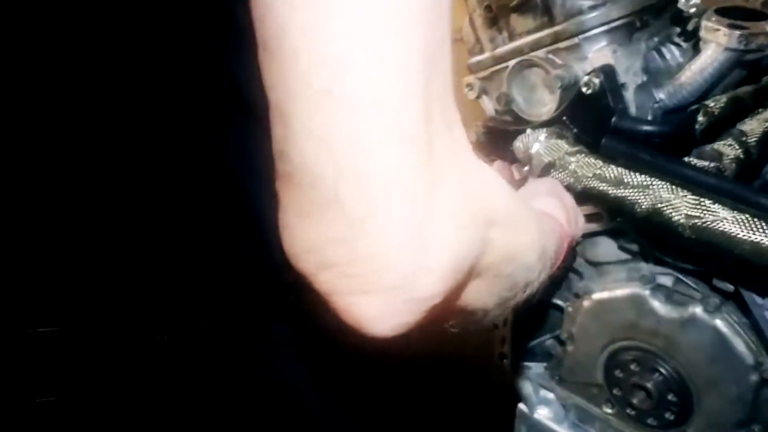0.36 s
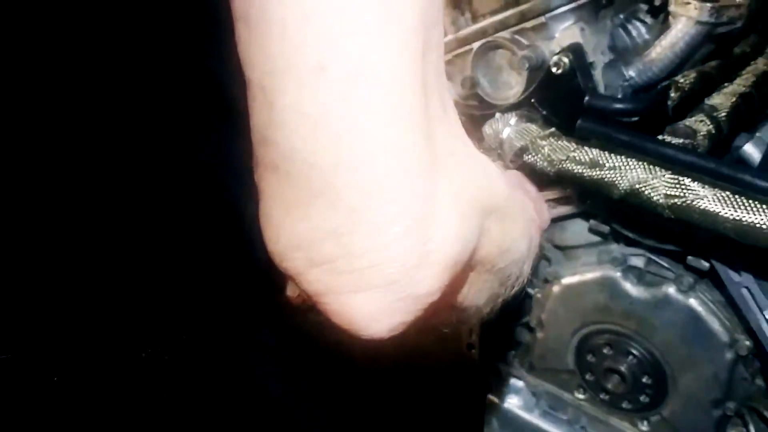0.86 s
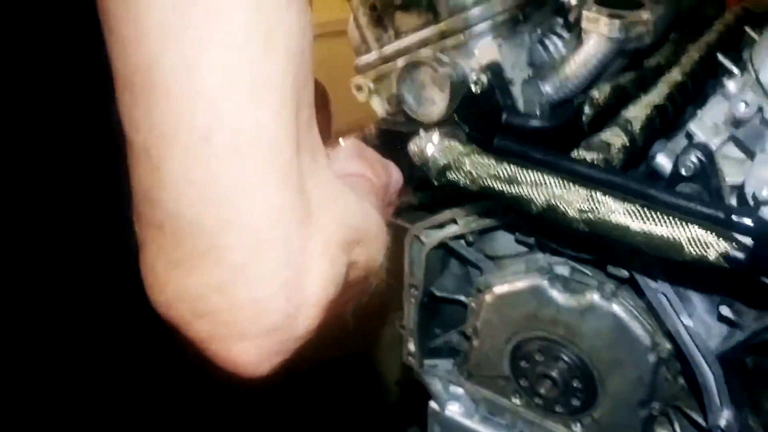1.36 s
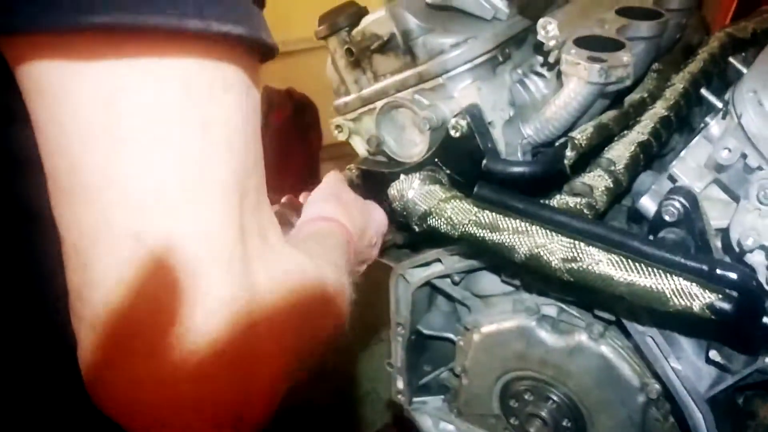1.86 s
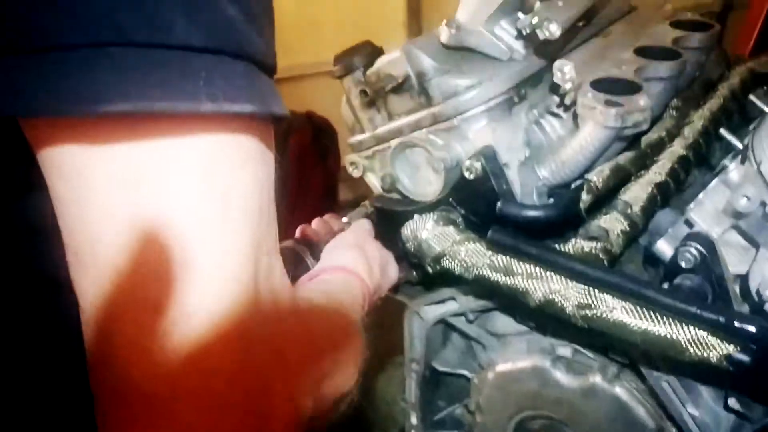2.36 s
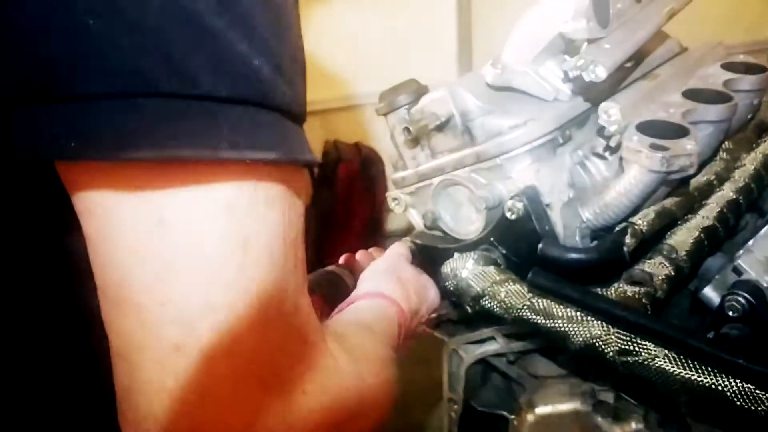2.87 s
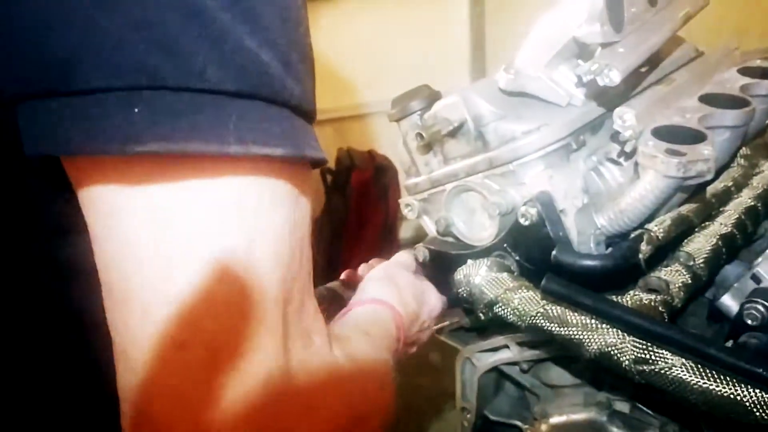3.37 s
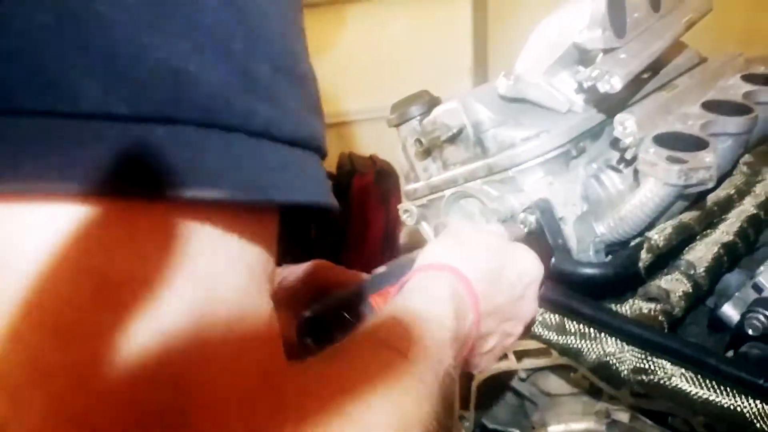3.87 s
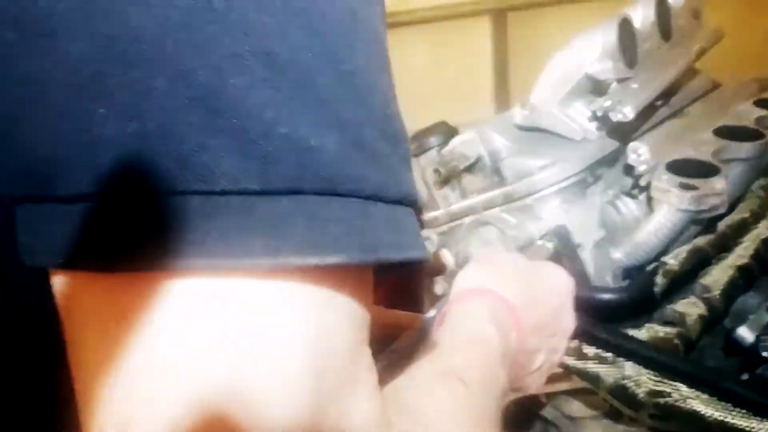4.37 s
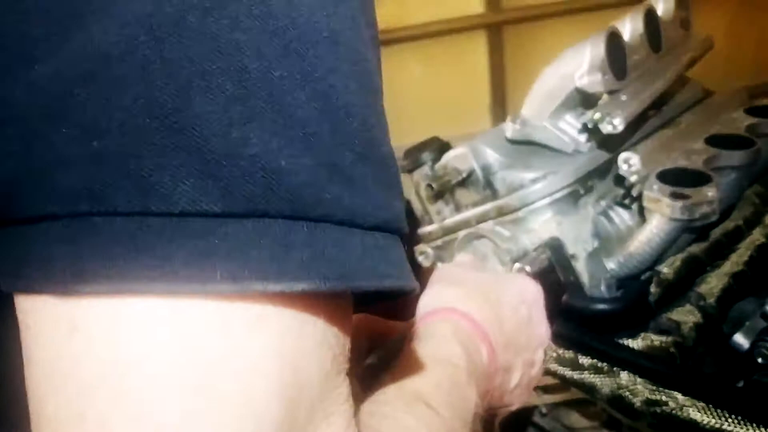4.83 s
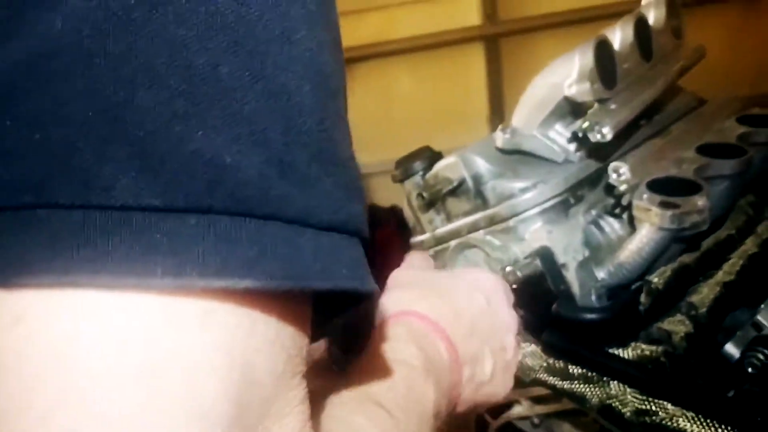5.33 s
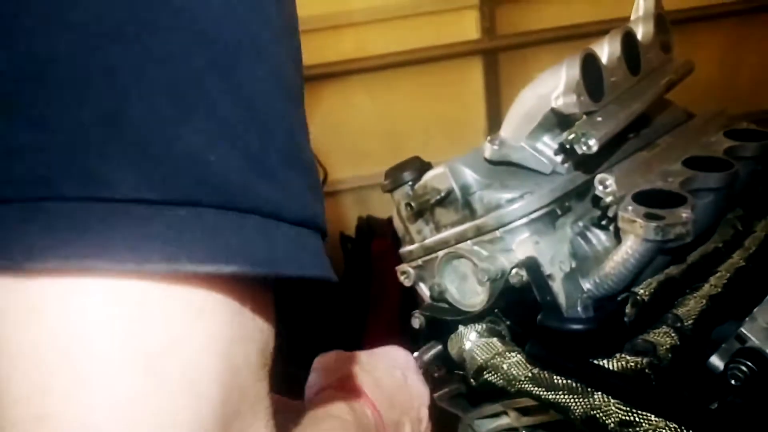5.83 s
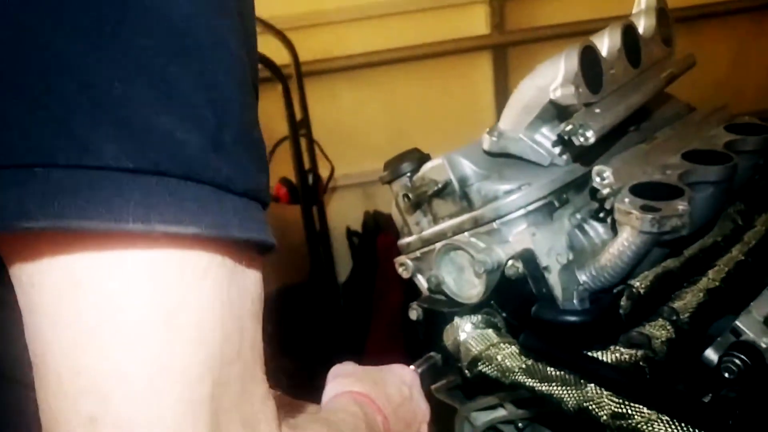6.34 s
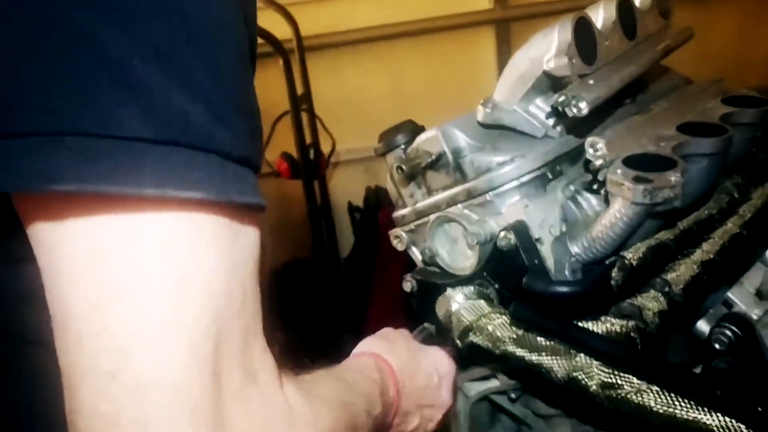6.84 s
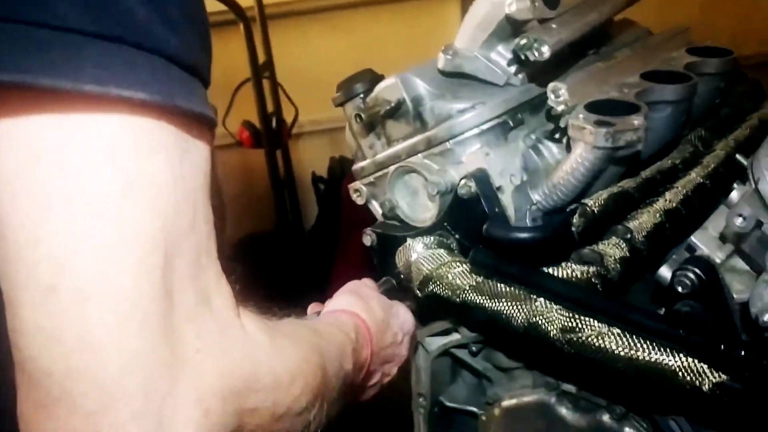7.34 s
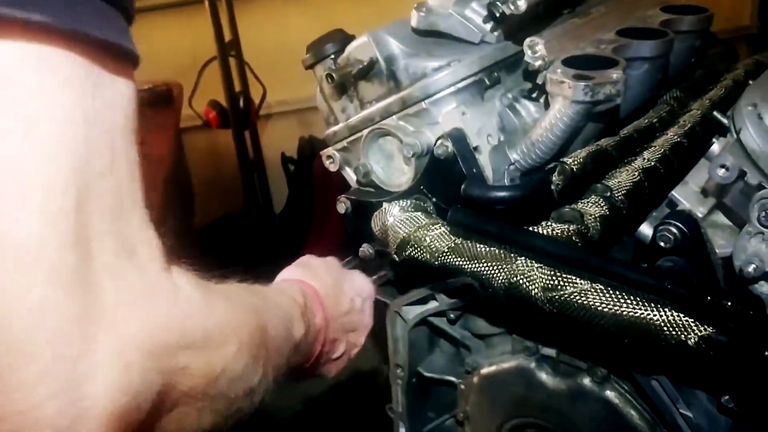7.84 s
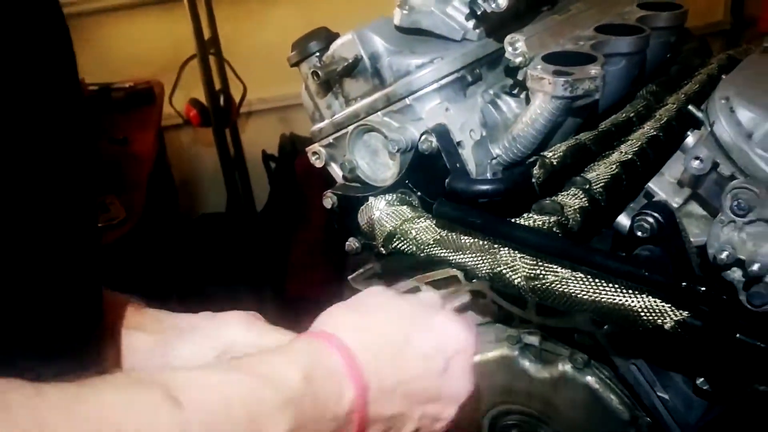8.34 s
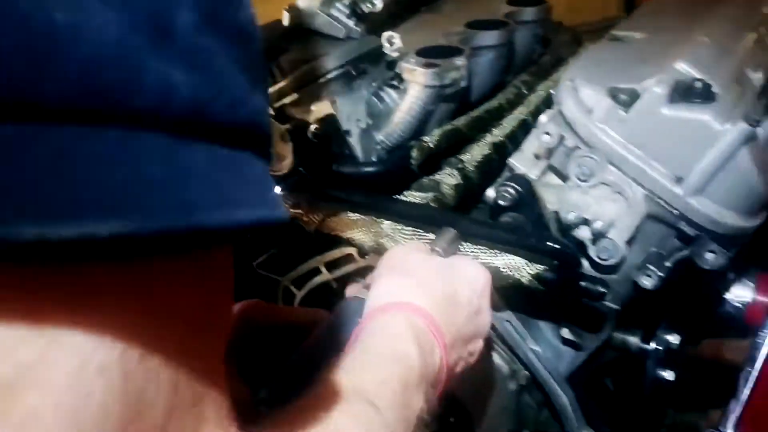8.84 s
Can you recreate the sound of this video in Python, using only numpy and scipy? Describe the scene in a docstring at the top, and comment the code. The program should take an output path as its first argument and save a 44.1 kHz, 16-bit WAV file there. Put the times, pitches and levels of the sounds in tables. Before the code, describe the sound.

A handheld recorder sits close to a small electric wrench tightening bolts on an engine. Early heavy finger rubbing on the left accompanies the first whirring, hammering burst; scrapes and grip knocks follow. Three more bursts come later, each a quick whine falling into rapid metal blows. Sharp trigger and socket ticks lie between them, over quiet low shop hum and a short room echo. The tool is clearer and brighter on the right.

```python
"""Workshop: a small cordless power wrench runs bolts down on an engine; motor and gears whir, whine, then hammer.
Whir and drone are filtered random tooth contacts, whine is sines following the motor, blows ring decaying modes.
A hand holds the stereo recorder, muffles its left port and rubs and bumps the case: filtered grit, short swings.
Sleeve and skin rustle near the right port; coloured noise makes the air and low hum of the shop."""
import sys
import numpy as np
from scipy import signal
from scipy.fft import rfft, irfft
from scipy.io import wavfile

SR = 44100
rng = np.random.default_rng(int(sys.argv[2]) if len(sys.argv) > 2 else 0)


def master_out(mix):
    """Clip the mix to full scale and print it as 16-bit PCM to the path in sys.argv[1]."""
    frames = np.transpose(np.atleast_2d(mix))
    ceiling = np.clip(frames, -1, 1)
    pcm = np.round(ceiling * 32767).astype(np.int16)
    wavfile.write(sys.argv[1], SR, pcm)


def voltage_ratio(decibels):
    """Convert decibels (scalar or array-like) to amplitude ratios, 20 dB per decade."""
    exponent = np.asarray(decibels, float) / 20
    return 10 ** exponent


N = 405719

# long trigger pulls, one list each: t/s, gear mesh f/Hz, relative whir level/dB, mesh tone re whir/dB
TRIGGER_PULLS = [
    [(.215, 800, -44.5, -19.5), (.275, 1400, -33.5, -4.5), (.345, 2950, -28.5, -7),
     (.39, 3070, -26.5, -4.5), (.45, 2300, -32.5, -14.5), (.52, 1100, -40, -16), (.61, 1882, -30.5, -6.5),
     (.7, 3100, -23.5, -11.5), (.735, 3380, -23, 1.5), (.765, 3000, -21.5, -1), (.8, 2500, -16, -21.5),
     (.885, 2300, -18.5, -22)],
    [(2.69, 800, -44, -14.5), (2.74, 1200, -31.5, -14), (2.78, 1600, -30.5, 3), (2.83, 2300, -25.5, -4),
     (2.875, 2520, -21.5, -3), (2.91, 3280, -22.5, 0.0), (2.975, 3290, -21.5, 2), (3.045, 2400, -26, 1.5),
     (3.085, 1740, -27.5, 2.5), (3.14, 2100, -25.5, 0.0), (3.19, 1600, -27, 3), (3.26, 1050, -27, -9.5),
     (3.35, 900, -24, -19.5)],
    [(5.125, 900, -41.5, -11.5), (5.17, 1300, -34, -8), (5.235, 2030, -27, 0), (5.26, 2100, -25.5, -11),
     (5.29, 1791, -23, -15), (5.35, 2290, -20.5, -6), (5.46, 2340, -20, -6.5), (5.495, 1600, -20, 0),
     (5.54, 1300, -16.5, -20.5)],
    [(7.435, 900, -38, -24.5), (7.505, 1740, -33.5, -1.5), (7.57, 2450, -27, -6), (7.6, 2200, -25, -11),
     (7.65, 2300, -23.5, -7.5), (7.7, 2330, -21.5, -5), (7.75, 2000, -19, -19), (7.86, 1900, -18, -19.5)],
]
# treble colour of gear whir and impact cracks: f/Hz, density/dB
WHIR_COLOUR = [(900, -24.5), (1500, -10.5), (2400, -8.5), (2900, -11), (3800, -5.5), (5300, -8.5),
               (6200, -2.5), (8100, 1), (8500, -15), (9200, -17), (15600, -21)]
# modes of socket, bolt and casting: f/Hz, relative level/dB, t60/s
CASTING_MODES = [(595, -12.5, 0.054), (782, -17.5, 0.34), (1197, 2, 0.017), (1287, -10.5, .04),
                 (1600, -5, 0.016), (1807, -8.5, 0.095), (1860, -7, 0.11), (1959, -9, 0.045),
                 (2054, -8.5, 0.082), (2155, 2.5, 0.026), (2280, -12.5, 0.057), (3276, -1, 0.014),
                 (5540, -8, 0.0082), (6300, 3, .01), (7260, -19, .01)]


def at_hz(points, hz):
    """Table value on a log-frequency axis."""
    table_hz, value = np.array(points).T
    return np.interp(np.log(hz + 1e-9), np.log(table_hz), value)


def rms_one(x):
    """Scale to unit rms."""
    return x / np.sqrt(np.mean(x ** 2) + 1e-20)


def played(tables):
    """Gate with 6 ms edges and the columns in time, for tables that each cover one span."""
    t = np.arange(N) / SR
    s, *columns = np.transpose(np.concatenate(tables))
    gate = np.zeros(N)
    for rows in tables:
        inside_s = np.minimum(t - rows[0][0], rows[-1][0] - t)
        gate += np.clip(inside_s / .006 + 1, 0, 1)
    return [np.minimum(gate, 1)] + [np.interp(t, s, column) for column in columns]


def colour(x, spectrum):
    """Causal minimum-phase filter with the given dB response."""
    gain = voltage_ratio(at_hz(spectrum, np.linspace(0, SR / 2, 2049)))
    cepstrum = irfft(np.log(gain))
    cepstrum[1:2048] *= 2      # fold to minimum phase
    response = irfft(np.exp(rfft(cepstrum[:2049], 4096)))
    return signal.oaconvolve(np.atleast_2d(x), response[None], axes=1)[:, :N]


def band(x, low_hz, high_hz):
    """Band-pass from a second-order Butterworth prototype."""
    return signal.sosfilt(signal.butter(2, [low_hz, high_hz], "band", fs=SR, output="sos"), x)


def ring(clicks, hz, t60):
    """A unit click excites a two-pole resonator: a decaying sine of initial height 1."""
    r, w = voltage_ratio(-60 / (t60 * SR)), 2 * np.pi * hz / SR
    return signal.lfilter([0, np.sin(w)], [1, -2 * r * np.cos(w), r * r], clicks + 1e-18)


def drift(rate_hz):
    """Random waver of rms 1: noise through a double one-pole low-pass at rate_hz."""
    r = np.exp(-2 * np.pi * rate_hz / SR)
    noise = rng.standard_normal(N + SR)
    return rms_one(signal.lfilter([1], [1, -2 * r, r * r], noise)[SR:])


def grit(per_s, spread_db):
    """Random contacts of uneven size and sign; rms 1."""
    size_db = spread_db * np.minimum(rng.exponential(1, N), 5)
    sizes = voltage_ratio(size_db) * rng.choice([-1, 1], N)
    return rms_one(sizes * (rng.random(N) < per_s / SR))


def strokes(s, rise_s, fall_s, db):
    """Gain in time of strokes that swell to a peak and fade; their powers add."""
    power, t = np.zeros(N), np.arange(N) / SR
    for at, rise, fall, peak_db in zip(s, np.maximum(rise_s, .005), np.maximum(fall_s, .005), db):
        span = slice(max(0, int((at - 5 * rise) * SR)), int((at + 5 * fall) * SR))
        away = np.where(t[span] < at, (at - t[span]) / rise, (t[span] - at) / fall)
        # 14 dB down one rise or fall from the peak; exponent 1 pointed, 2 round
        power[span] += voltage_ratio(peak_db - 14 * away ** 1.2) ** 2
    return np.sqrt(power)


def strike(at_s, peak_db, modes):
    """Every hit rings every mode with its own strength; peak_db may hold one row a mode."""
    at, out = (np.array(at_s) * SR).astype(int), np.zeros(N)
    strengths_db = rng.normal(0, 4, (len(at), len(modes))).T + peak_db
    for (hz, db, t60), strength_db in zip(modes, strengths_db):
        clicks = np.zeros(N)
        clicks[at] = voltage_ratio(strength_db + db) * rng.choice([-1, 1], len(at))
        out += ring(clicks, hz, t60)
    return out


def crack(at_s, peak_db, t60):
    """A decaying burst of broad noise at each hit."""
    clicks = np.zeros(N)
    clicks[(np.array(at_s) * SR).astype(int)] = voltage_ratio(peak_db)
    envelope = signal.lfilter([1], [1, -voltage_ratio(-60 / (t60 * SR))], clicks)
    return envelope * rms_one(colour(rng.standard_normal(N), WHIR_COLOUR)[0])


def shop_air():
    """Steady coloured noise, partly shared by the ports, over a wavering low hum of band noise."""
    # background colour: f/Hz, density/dB
    air_colour = [(25, -13.5), (70, -3.5), (165, -8), (360, -16), (554, -5.5), (1280, -32.5), (3850, -39),
                  (7550, -37), (9110, -53.5), (12300, -41), (15600, -55)]
    # low hum: t/s, level/dB
    hum_level = [(0, -43.5), (1.501, -47.5), (6, -51.5), (9.2, -48)]
    shared, own = rng.standard_normal(N), rng.standard_normal((2, N))
    air = voltage_ratio(-50) * rms_one(colour(1.6 * shared + own, air_colour))
    s, db = np.transpose(hum_level)
    hum_noise = rng.standard_normal(N) + .5 * rng.standard_normal((2, N))
    hum = rms_one(band(hum_noise, 42, 85))
    return air + voltage_ratio(np.interp(np.arange(N) / SR, s, db)) * hum


def rubbing():
    """Fingers on the recorder case: soft friction plus brighter scratch, almost all in the left port."""
    # strokes: peak t/s, rise/s, fall/s, rub level/dB, scratch re rub/dB
    finger_strokes = [(.1, 0.24, 0.16, -52.5, -7.5), (.4, 0.12, 0.23, -31, -14.5),
                      (.74, 0.087, .03, -25, -5.5), (1.05, 0.027, .09, -33.5, -9.5),
                      (1.25, .12, 0.113, -34.5, -13.5), (1.341, 0.04, 0.064, -26.5, -8),
                      (1.51, 0.018, .05, -34, -8), (1.6, 0.19, .04, -36.5, -11.5),
                      (1.69, 0.016, .05, -28.5, -4), (1.725, 0.047, .09, -32.5, -2.5),
                      (1.9, 0.18, .3, -37.5, -10.5), (2.069, 0.11, .15, -42, -6.5),
                      (2.24, .1, .05, -41, -7.5), (2.45, 0.031, .08, -29.5, -4.5),
                      (3.7, 0.46, .2, -39, -12), (3.91, 0.15, 0.11, -29.5, -23.5),
                      (4.128, 0.13, 0.09, -40, -5.5), (4.92, 0.019, .03, -25.5, -9),
                      (5.8, 0.37, 0.43, -41.5, -7), (6.07, 0.14, 0.24, -33, -10.5),
                      (6.3, 0.12, 0.14, -39, -10.5), (6.66, 0.36, 0.17, -47.5, -11),
                      (8.56, .05, 0.044, -47, -6.5), (9.1, .13, .08, -39.5, -6)]
    # rub colour: f/Hz, density/dB
    rub_colour = [(60, -5.5), (210, -3.5), (290, -5.5), (400, -4), (560, 6), (760, -2.5), (1200, -16.5),
                  (3000, -53.5)]
    scratch_colour = [(700, -8.0), (1200, 4.5), (2000, -9.5), (4000, -14.5), (7000, -31.5)]
    s, rise_s, fall_s, rub_db, scratch_db = np.transpose(finger_strokes)
    rub = rms_one(colour([grit(3000, spread_db=2.5), grit(3000, spread_db=2.5)], rub_colour))
    scratch = rms_one(colour(grit(8000, spread_db=0.5), scratch_colour)[0])
    friction = strokes(s, rise_s, fall_s, rub_db) * rub
    friction = friction + strokes(s, rise_s, fall_s, rub_db + scratch_db) * scratch
    return voltage_ratio(2.2 * drift(25)) * friction * voltage_ratio([[0], [-16]])


def rustle():
    """Sleeve and skin brush near the right port: soft bright grit."""
    # strokes: peak t/s, rise/s, fall/s, level/dB
    brush_strokes = [(.08, 0.16, 0.058, -42.5), (1.27, .13, .2, -48), (1.52, .12, .1, -51.5),
                     (1.72, 0.035, .1, -59), (1.88, .1, .08, -54.5), (1.98, .07, 0.092, -53.5),
                     (2.12, .15, 0.24, -53.5), (3.7, 0.074, 0.13, -56), (3.84, 0.073, 0.078, -50.5),
                     (4.09, 0.046, .08, -60), (4.2, 0.13, 0.029, -53.5), (6.661, 0.082, .15, -63),
                     (8.33, 0.077, .07, -57.5), (8.66, .03, 0.13, -61), (8.86, .09, 0.14, -54.5),
                     (8.97, .04, .03, -51.5)]
    # brush colour: f/Hz, density/dB
    brush_colour = [(900, -18), (1500, -10), (3000, -11.5), (6000, -10.5), (7900, 0), (9000, -21),
                    (15600, -16.5)]
    brush = colour([grit(9000, spread_db=3.0), grit(9000, spread_db=3.0)], brush_colour)
    gain = strokes(*np.transpose(brush_strokes)) * voltage_ratio(drift(20))
    return gain * rms_one(brush) * voltage_ratio([[-10], [0]])


def ticks():
    """Light trigger and socket contacts: short crack, small parts ringing, casting body damped by the fingers."""
    # contacts: t/s, relative level/dB, casting body (modes under 3.5 kHz) re level/dB
    contacts = [(0.0631, -23.5, -6), (0.2101, -36.5, -1), (1.8492, -32, 1), (1.8617, -31.5, 6),
                (1.952, -33.5, -4), (2.2324, -42, -4), (2.38, -27, -16), (2.5607, -11, -25.5),
                (4.1552, -25, -7), (4.1626, -30, -12), (4.1952, -40.5, -29), (4.7686, -27, -9),
                (4.9626, -8.5, -11), (5.1256, -31, -8.5), (7.0463, -43.5, -12), (7.0818, -46, -18.5),
                (7.3601, -44.5, -24), (7.4256, -32.5, -19.5), (7.9946, -23, -7.5), (8.6318, -28, 5.5),
                (8.8005, -33.5, 2), (8.8283, -30, -15), (8.992, -19.5, -6), (8.9985, -20, -1)]
    # small steel parts of switch and socket: f/Hz, relative level/dB, t60/s
    pawl_modes = [(4600, -5, .007), (6000, -6, .006), (7400, -1, .007), (8000, -5, .006)]
    s, db, body_db = np.transpose(contacts)
    damped = [(hz, level_db, .13 * t60) for hz, level_db, t60 in CASTING_MODES if hz < 3500]
    body = strike(s, db + body_db - 1.5, damped)
    return body + strike(s, db, pawl_modes) + crack(s, db, t60=0.0096)


def trigger():
    """Whir and drone gains in time; a brief touch swells, holds, then coasts down."""
    # brief touches, too slow to whine: start t/s, length/s, relative whir level/dB, drone gain re whir/dB
    touches = [(2.375, 0.19, -35, -7.5), (4.758, .205, -39, -3), (8.508, 0.07, -44.5, -1.5),
               (8.998, 0.079, -35, 3.5)]
    # drone gain re whir in each long pull, at a whir level of -24 dB: gain/dB
    pull_drone_db = [-6, -6.5, -5, -4]
    drone_growth = 0.34      # extra drone dB per dB of whir
    spin_up_s, spin_up_db, coast_db_per_s = 0.027, 9, 352
    gate, hz, db, tone_db = played(TRIGGER_PULLS)
    t = np.arange(N) / SR
    whir = gate * voltage_ratio(db)
    pull = np.searchsorted([rows[0][0] - .1 for rows in TRIGGER_PULLS[1:]], t)
    drone = whir * voltage_ratio(np.array(pull_drone_db)[pull] + drone_growth * (db + 24))
    for start, length, top_db, drone_db in touches:
        lack_db = spin_up_db * np.clip(1 - (t - start) / spin_up_s, 0, 1)
        lack_db += coast_db_per_s * np.maximum(t - start - length, 0)
        touch = np.clip((t - start) / .006 + 1, 0, 1) * voltage_ratio(top_db - lack_db)
        whir = whir + touch
        drone = drone + touch * voltage_ratio(drone_db)
    return whir, drone


def gears():
    """Tooth contacts whir in the treble and drone in the plastic housing; both shake with the loose gearing."""
    # housing modes: f/Hz, width/Hz, relative level/dB
    housing_modes = [(584.3, 25, -5), (820, 87, 1.5), (1080, 380, 5), (1600, 180, -20)]
    whir_gain, drone_gain = trigger()
    shake = voltage_ratio(1.3 * drift(70))
    whir = rms_one(colour(grit(9000, spread_db=3.5), WHIR_COLOUR)[0])
    teeth = grit(3000, spread_db=2.0)
    drone = np.zeros(N)
    for hz, width_hz, db in housing_modes:
        t60 = np.log(1000) / (np.pi * width_hz)
        drone += voltage_ratio(db) * np.sqrt(width_hz) * ring(teeth, hz, t60)
    return shake * voltage_ratio(7.5) * (whir_gain * whir + voltage_ratio(-5) * drone_gain * rms_one(drone))


def whine():
    """Mesh tone and overtones follow the motor speed, rough in pitch and level; low-passed at 8.6 kHz."""
    # overtones: multiple of mesh f, relative level/dB
    overtones = [(1, -2), (2, 0), (3, -7), (4, -4)]
    # how the tool body passes a tone: f/Hz, gain/dB
    radiation = [(1000, -10), (1600, -9.5), (2300, -11), (3200, -5), (4000, -4), (4700, -6.5), (5500, -2),
                 (6500, 3), (8000, -2.5)]
    gate, hz, whir_db, tone_db = played(TRIGGER_PULLS)
    phase = 2 * np.pi * np.cumsum(hz * (1 + .012 * drift(150))) / SR
    tones = np.zeros(N)
    for k, db in overtones:
        flicker = voltage_ratio(2.5 * drift(35))
        tones += voltage_ratio(db + at_hz(radiation, k * hz)) * flicker * np.sin(k * phase)
    tones = signal.sosfilt(signal.butter(8, 8600, fs=SR, output="sos"), tones)
    return gate * voltage_ratio(whir_db + tone_db + 9) * tones


def hammer():
    """Blows every half turn, strong and weak in turn; each bounces twice, cracks and rings the casting."""
    # hammer on anvil, bolt seated: start t/s, end t/s, gap/s, relative level/dB, 1-1.7 kHz mode gain/dB
    blow_runs = [(0.749, .887, .0099, -6.5, -2.5), (3.271, 3.345, .0101, -10.5, 0.5),
                 (5.507, 5.548, .0110, -11, 0.5), (7.7057, 7.864, .0084, -8, 5.0)]
    s, db, low_db = [], [], []
    for start, end, gap, run_db, run_low_db in blow_runs:
        run = np.arange(start, end, gap)
        s.append(run)
        db.append(run_db - 3 * (np.arange(len(run)) % 2))      # every second blow weaker
        low_db.append(np.full(len(run), run_low_db))
    s, db = np.concatenate(s), np.concatenate(db)
    low_db = np.tile(np.concatenate(low_db), 3)
    chance = rng.standard_normal((4, len(s)))
    s = s + .0007 * chance[0]
    db = db + 2.0 * chance[1]
    # blow, first bounce, second bounce
    s = np.concatenate([s, s + .0016 + 0.00037 * chance[2], s + .004 + 0.0012 * chance[3]])
    db = np.concatenate([db, db - 1.0, db - 4.5])
    is_low = np.array([[1000 < hz < 1700] for hz, level_db, t60 in CASTING_MODES])
    return strike(s, db - 7.5 + is_low * low_db, CASTING_MODES) + crack(s, db - 0.5, t60=0.02)


def bumps():
    """Taps and slips of the grip: a few swings of the case, which rings on; almost all in the left port."""
    # taps: t/s near the envelope peak, relative level/dB, f/Hz
    taps = [(1.168, -14, 527), (1.2945, -16.5, 591), (1.3172, -15.5, 645), (1.332, -8, 585),
            (1.3501, -5.5, 570), (1.3575, -2.5, 610), (1.3666, -11.5, 633), (1.5033, -16, 880),
            (1.5246, -14.5, 616), (1.5638, -12.5, 189), (1.572, -16, 138.3), (1.586, -15, 253.2),
            (3.4457, -24, 233), (3.5258, -22, 172), (3.5926, -12.5, 490), (3.758, -20, 547),
            (3.862, -27, 520), (3.9001, -19, 551), (4.3542, -27, 520), (4.4197, -17.5, 428),
            (4.6022, -18.5, 498), (4.6069, -18, 453), (4.7013, -11.5, 439), (4.734, -16, 579.5),
            (4.8254, -18, 590), (4.84, -7.5, 408.4), (4.9164, -13, 660), (4.925, -23.5, 601),
            (5.0293, -17.5, 570), (5.2379, -18, 400)]
    case_modes = [(139.4, -17, .05), (570, -10.5, .04), (1087, -15.5, .015), (2580, -30.0, 0.0072)]
    thuds = np.zeros(N)
    for s, db, hz in taps:
        start = round((s - 0.78 / hz) * SR)
        cycles = np.arange(round(7 / hz * SR)) * hz / SR
        swing = -np.cos(2 * np.pi * cycles) + 0.14 * np.sin(4 * np.pi * cycles)
        envelope = (cycles / 0.77 * np.exp(1 - cycles / 0.75)) ** 4.5
        thuds[start:start + len(cycles)] += voltage_ratio(db) * swing * envelope
    s, db, hz = np.transpose(taps)
    thuds += strike(s - .0005, db, case_modes)
    return thuds * voltage_ratio([[0], [-28]])


def shop(x):
    """Direct sound, scatter off engine and arm, and a diffuse tail dying band by band, own at each port."""
    # reverberation: f/Hz, t60/s
    shop_t60 = [(300, 0.57), (800, 0.42), (2000, 0.42), (6000, 0.32), (14000, 0.18)]
    t = np.arange(SR // 2) / SR
    edges_hz = 150 * 2.0 ** np.arange(0, 7.1, 1)
    tail = np.zeros((2, len(t)))
    for low, high in zip(edges_hz, edges_hz[1:]):
        decay = voltage_ratio(-60 * t / at_hz(shop_t60, np.sqrt(low * high)))
        tail += band(rng.standard_normal((2, len(t))), low, high) * decay
    tail *= np.clip(t / .01, 0, 1) * voltage_ratio(-9) / np.sqrt(np.sum(tail ** 2) / 2)
    scatter = band(rng.standard_normal((2, len(t))), 1200, 16000) * voltage_ratio(-60 * t / .04)
    tail += voltage_ratio([[-3], [-12]]) * scatter / np.sqrt(np.sum(scatter ** 2) / 2)
    tail[0, 1:6] += .16      # left port faces away: mainly lows bend round to it directly
    tail[1, 0] += .75
    return signal.fftconvolve(x[None], tail, axes=1)[:, :N]


def muffle_left(left):
    """The hand over the left port dulls the wrench there."""
    # muffling filter: f/Hz, gain/dB
    port_gain = [(300, -4.5), (700, 0), (1300, -3.5), (2400, -5.5), (4400, -8.5), (6000, -18.5),
                 (8100, -43.5), (15000, -8)]
    return colour(left, port_gain)[0]


def scene():
    """The wrench in the shop, dulled at the left port, with the hand and the air."""
    wrench = gears() + whine() + hammer() + ticks()
    # a small tool radiates no bass
    wrench = signal.sosfilt(signal.butter(4, 420, "high", fs=SR, output="sos"), wrench)
    left, right = shop(wrench)
    return np.array([muffle_left(left), right]) + rubbing() + bumps() + rustle() + shop_air()


def roll_off(x):
    """The treble ends steeply here."""
    return signal.sosfilt(signal.butter(12, 15770, fs=SR, output="sos"), x)


def record(dry):
    """Soft saturation rounds the loudest peaks."""
    mix = np.tanh(dry / 0.99) * 0.91
    return roll_off(mix)


dry = scene()
out = record(dry)
master_out(out)
```